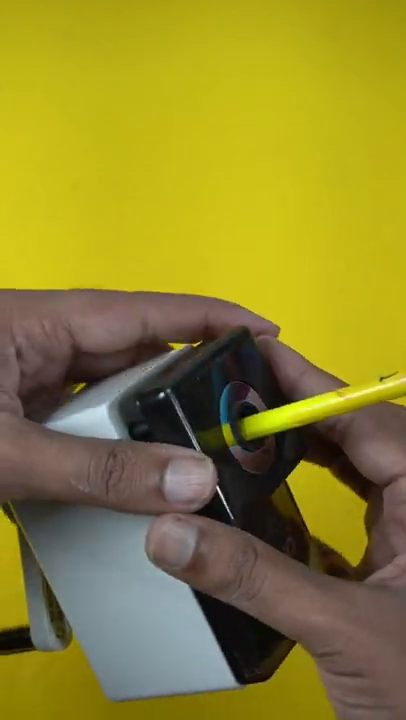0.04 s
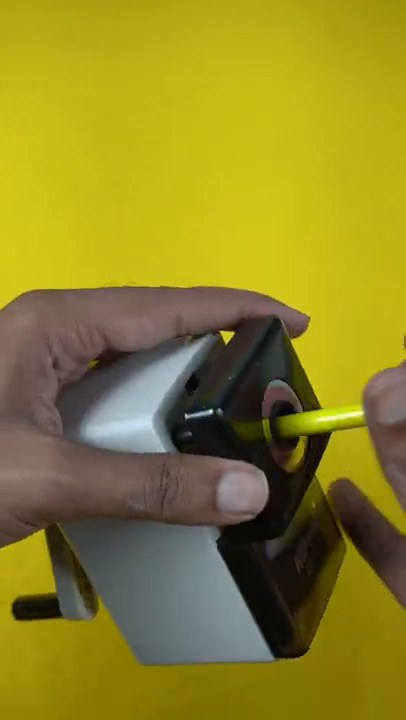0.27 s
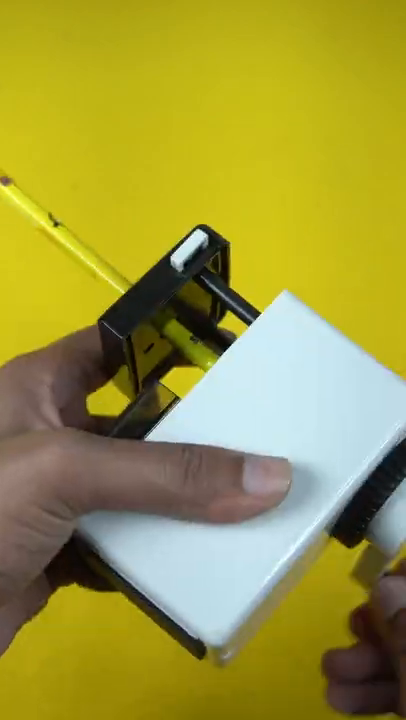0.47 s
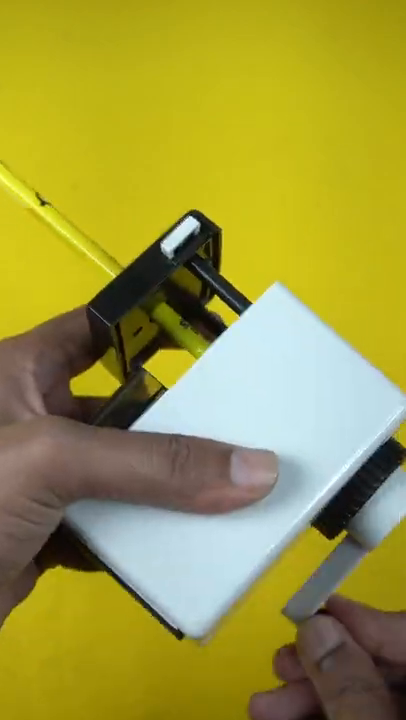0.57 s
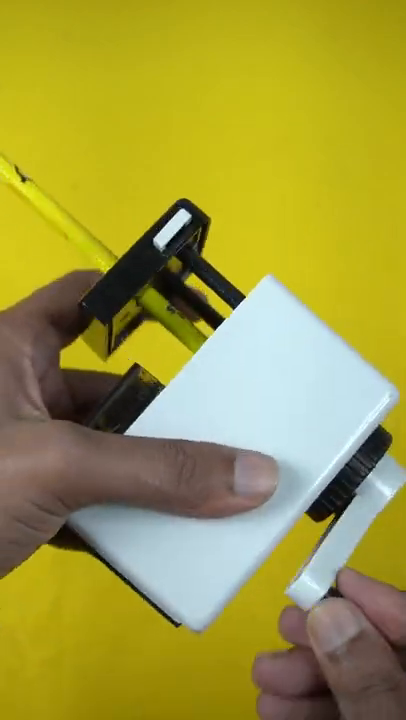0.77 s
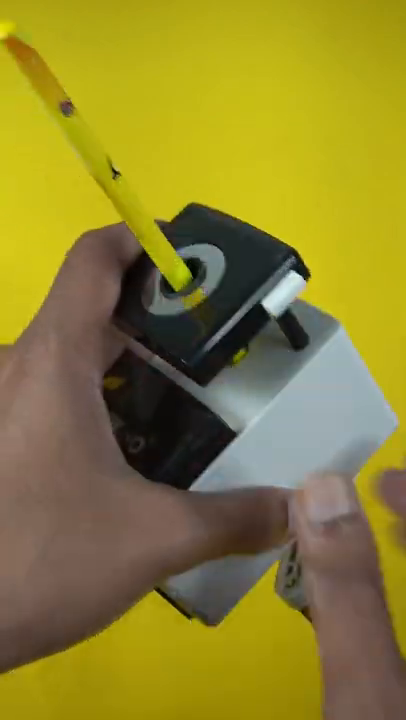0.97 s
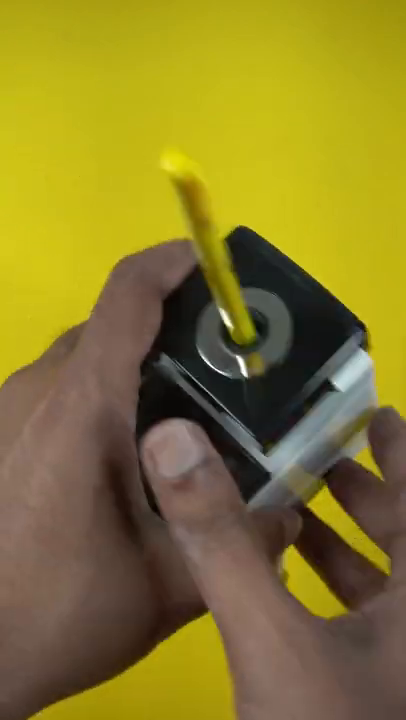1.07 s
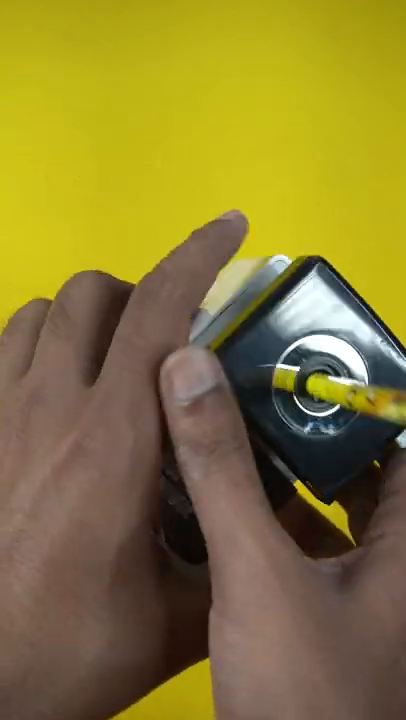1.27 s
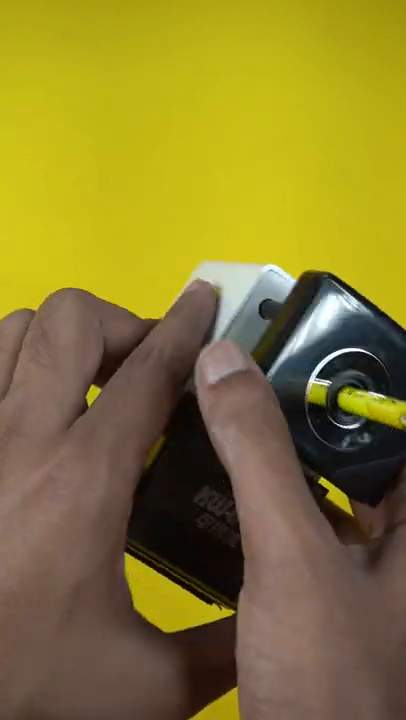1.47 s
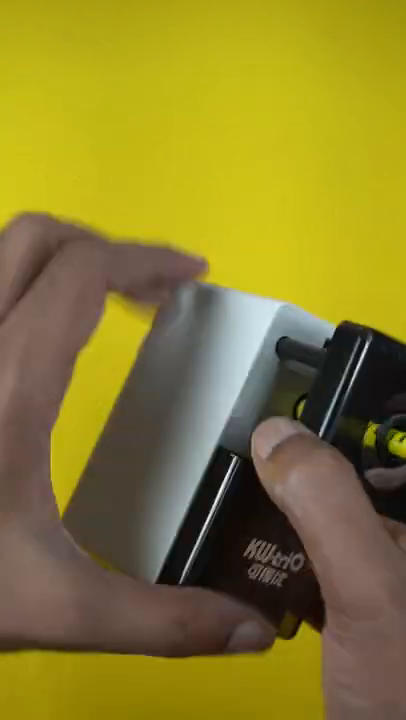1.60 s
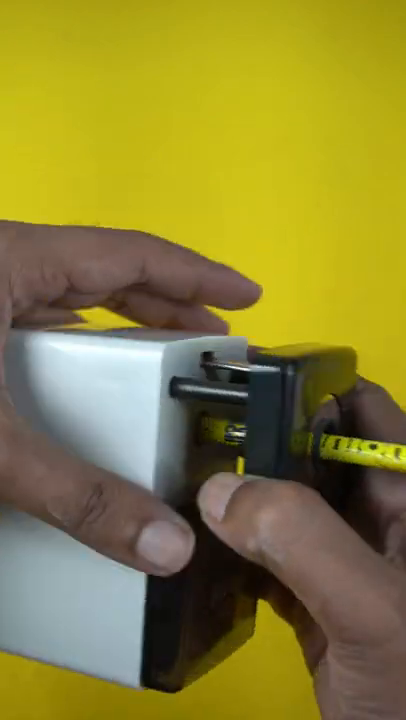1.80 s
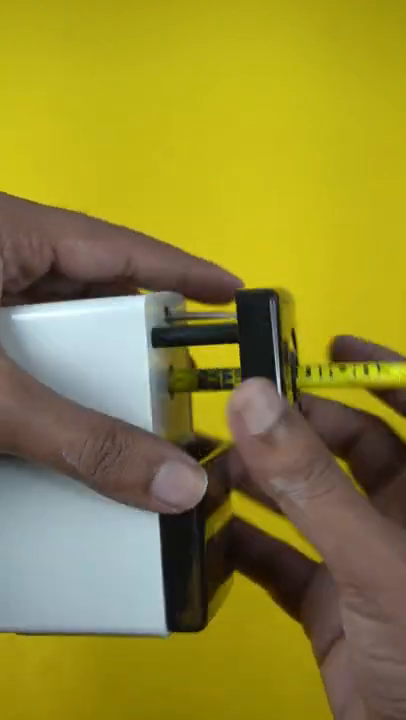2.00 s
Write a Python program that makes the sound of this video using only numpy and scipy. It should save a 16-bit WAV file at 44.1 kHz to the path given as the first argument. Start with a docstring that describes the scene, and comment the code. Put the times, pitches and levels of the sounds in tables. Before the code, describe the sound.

Close up in a small room, a hand-cranked pencil sharpener gives hollow plastic clacks and a short rasp of cut wood. A small metallic click follows, then more rattling knocks and light scraping as its holder shuts and reopens.

```python
"""A hand-cranked pencil sharpener

A plastic sharpener is handled close by, above a table in a small room. Impacts excite the modes of its
hollow casing as knocks and clicks, and the clamp's spring twangs. One turn of the crank drives the milling
cutter through the wood, whose tearing chips excite resonances. A metal catch pings, then the sprung pencil
holder slams home and is drawn out again with sliding friction, over a low rumble and a faint whine."""
import sys
import numpy as np
from scipy import signal
from scipy.fft import rfft, irfft
from scipy.io import wavfile
from scipy.ndimage import uniform_filter1d

SR = 44100
rng = np.random.default_rng(int(sys.argv[2]) if len(sys.argv) > 2 else 0)


def generate_wav(sig):
    """Save sig (samples, or channels by samples) to the path in sys.argv[1] as 16-bit PCM at SR."""
    pcm = np.round(np.clip(np.atleast_2d(sig).T, -1, 1) * 32767).astype(np.int16)
    wavfile.write(sys.argv[1], SR, pcm)


N = 90404
T = np.arange(N) / SR
RING_T = T[:SR // 3]  # time axis of one impact, in seconds
CUTOFF_HZ = 15800


def grinding():
    """Forced vibration: each bite of a blade tears off a spray of chips that drives resonances."""
    # Each row: time in seconds, then relative levels of body, hiss and gear rumble in dB.
    envelope = [(0.402, -75, -60, -59), (.412, -38, -49, -42), (.44, -42, -51, -49),
                (0.474, -40.5, -52.5, -53), (0.495, -35.5, -39, -48), (.526, -32.5, -43, -52),
                (0.572, -38, -45, -41.5), (0.584, -32, -35.5, -51), (.606, -33.5, -42, -42),
                (.622, -34.5, -34, -41), (0.647, -31.5, -39, -39.5), (.68, -29.5, -38.5, -47),
                (.706, -26.5, -32.5, -37.5), (0.739, -34, -43, -46.5), (0.771, -34.5, -40.5, -56),
                (.795, -54, -67, -53), (.83, -73, -77, -61)]
    # Resonances under the cutter, low and high. Each row: centre and width in Hz, relative gain in dB.
    body_peaks = [(642.3, 30, 0), (785, 18, 1), (817, 21, 1.5), (860.4, 25, 3.5), (909, 20, 1.5),
                  (987, 50, -3), (1078, 74, -2.5), (1300, 150, -5.5), (1498, 86, -4), (1863, 116, -1.5),
                  (1997, 124, -4), (2255, 114, -2.5), (3146, 250, -9.5), (3660, 230, -11)]
    hiss_peaks = [(3340, 360, -13), (4440, 890, 4), (5870, 270, 8), (6230, 610, 0.5), (7870, 480, 5),
                  (8830, 430, 6), (10700, 2500, -1.5), (13800, 2400, -0.5), (16300, 910, 0)]
    times, *levels_db = np.transpose(envelope)
    body_gain, hiss_gain, rumble_gain = [
        from_db(np.interp(T, times, db, left=-120, right=-120)) for db in levels_db]
    count, blades_per_s, jitter, bite_depth = 100, 100, 0.3, 2.4
    bite_times = times[0] + (np.arange(count) + jitter * rng.standard_normal(count)) / blades_per_s
    bites = np.zeros(N)
    bites[np.clip(bite_times * SR, 0, N - 1).astype(int)] = rng.uniform(0.28, 0.57, count)
    load = 1 + bite_depth * signal.fftconvolve(bites, decay(t60=0.022))[:N]
    load /= np.sqrt(np.mean(load[(T > times[0]) & (T < times[-1])] ** 2))
    chips = load * np.array([grains(N, per_s=16000, spread_db=2.5) for _ in range(2)])
    body = from_db(2.5) * resonate(widen(chips, width=0.35), body_peaks)
    hiss = from_db(3) * pan(0.58) * resonate(widen(chips, width=0.72), hiss_peaks)
    rumble = unit_power(band(widen(chips, width=0.15), 267, 700, order=2))
    return body_gain * body + hiss_gain * hiss + rumble_gain * rumble


def cutter_song():
    """Frictional excitation: under heavy load the wood rubs the steel cutter into resonance."""
    # Each row: time in seconds, level in dB.
    envelope = [(.63, -56), (.665, -36), (.695, -33), (.72, -43), (.775, -53), (.80, -76)]
    # Each row: centre and width of a resonance in Hz, relative gain in dB.
    steel_peaks = [(3630, 120, -19), (5830, 230, -7), (6750, 130, 2.5), (8170, 430, 2), (8380, 350, 4.5)]
    times, db = np.transpose(envelope)
    gain = from_db(np.interp(T, times, db)) * (T > times[0]) * (T < times[-1])
    return gain * resonate(stereo_noise(N, width=0.31), steel_peaks)


def impacts(blows, rattle_db, rattles_per_s, ring_db, shell_db, shell_t60, top_hz):
    """Convolution: a strike and a rattle of loose parts sound through thin shell and hollow casing."""
    # Each row: frequency in Hz, relative level in dB, 60 dB decay time in seconds.
    casing_modes = [(636, -1, 0.062), (674, -7, .08), (758, -1.5, 0.068), (837, -3, 0.054),
                    (880, -2.5, 0.032), (971.5, -1, 0.058), (1074, 4, 0.021), (1315, 1, 0.052),
                    (1477, -1.5, 0.058), (1565, 1, 0.036), (1732, 8, 0.029), (2007, -3, 0.038),
                    (2566, -3.5, 0.032), (2934, -1, 0.017)]
    # Limits of the body, clack, edge and snap bands in Hz.
    edges_hz = [520, 1400, 2600, 5200, 16000]
    attack_s, thump_db, strike_spread_db = 0.008, -15, 2.5
    out = np.zeros((2, N))
    for start, rattle_t60, *levels_db, side_db in blows:
        # Each blow lands elsewhere and favours other modes.
        struck = [(hz, db + strike_spread_db * rng.standard_normal(), t60)
                  for hz, db, t60 in casing_modes]
        ring = from_db(ring_db) * modes(struck)
        ring[0] += 1  # the direct path
        blow = from_db(rattle_db) * grains(len(RING_T), rattles_per_s, spread_db=2.4) * decay(rattle_t60)
        blow[0] += 1  # the strike itself
        shell = stereo_noise(len(RING_T), width=0.63) * decay(shell_t60)
        shell *= from_db(shell_db) / np.linalg.norm(shell[0])
        shell[:, 0] += 1
        burst = whiten(convolve(shell, blow))
        sound = band(convolve(burst, ring), 150, top_hz, order=2)
        parts = [band(sound, low, high) for low, high in zip(edges_hz, edges_hz[1:])]
        thump = band(sound, 315, 720, order=2)
        for part, db in zip(parts + [thump], levels_db + [levels_db[0] + thump_db]):
            attack_rms = part[:, :int(attack_s * SR)].std()
            add(out, start, pan(side_db) * from_db(db) * part / attack_rms)
    return out


def knocks():
    """Impact excitation: blows of casing and holder set the hollow plastic ringing."""
    # Each row: start and rattle decay time in seconds, then body, clack, edge, snap and pan in dB.
    blows = [(0.015, 0.0078, -53.5, -47, -78, -75, 2), (0.096, 0.013, -46, -57, -62, -66, -1),
             (0.113, 0.12, -41, -46, -61, -60, -2), (0.132, 0.045, -30, -32, -42, -57, -1),
             (0.1875, 0.024, -26, -30.5, -32, -39, -0.5), (0.336, 0.066, -35, -43, -52, -63, 0.5),
             (0.347, 0.022, -56, -36.5, -42.5, -59, -0.5), (0.4085, 0.086, -61, -36, -40.5, -51, 5),
             (0.435, 0.019, -59, -27, -34, -54, 0), (0.702, 0.011, -37, -29.5, -50, -38, 2),
             (0.7225, 0.019, -25.5, -21.5, -34.5, -47, 1), (0.765, 0.018, -40, -33, -36.5, -54, 1),
             (1.064, 0.057, -49.5, -74, -53, -59, 0), (1.101, 0.079, -36.5, -40.5, -46.5, -48.5, -1.5),
             (1.1095, 0.025, -48, -34.5, -41.5, -56, 2.5), (1.175, 0.018, -39.5, -33, -38.5, -57, -0.5),
             (1.213, 0.06, -50, -46.5, -67, -84, 1), (1.32, 0.023, -52.5, -53, -56, -64, -2),
             (1.383, 0.064, -24, -24.5, -31, -38.5, -0.5), (1.399, 0.061, -30, -25, -34, -51, 2.2),
             (1.679, 0.04, -26.5, -32, -42.5, -61, -0.5), (1.7455, 0.027, -25, -27.5, -32, -50, -2),
             (1.841, 0.042, -40.5, -42.5, -58, -57, 0), (1.852, 0.061, -56, -42.5, -47, -56.5, -1),
             (1.931, 0.046, -63, -45.5, -48, -65, 0), (2.022, 0.024, -44, -65, -56, -51, -4)]
    return impacts(blows, rattle_db=-16.5, rattles_per_s=1700, ring_db=-24.5,
                   shell_db=0.5, shell_t60=0.017, top_hz=9400)


def clicks():
    """Hard contact: brief blows of clamp and gears give more treble and less ring."""
    # Each row: start and rattle decay time in seconds, then body, clack, edge, snap and pan in dB.
    blows = [(0.181, 0.0051, -31.5, -34, -37, -37.5, 0), (0.232, 0.014, -69, -41.5, -30.5, -31, 0.5),
             (0.866, 0.0085, -48, -54, -57, -53, 2), (1.649, 0.0077, -40.5, -38, -37, -49, 0.5),
             (1.735, 0.0055, -42, -34, -39, -48.5, 2), (1.7695, 0.013, -51, -44, -30.5, -35.5, 0),
             (1.7925, 0.0073, -69, -38.5, -37, -46.5, 1), (1.945, 0.0033, -68, -45, -41, -65, 0),
             (1.998, 0.0088, -69, -57, -36.5, -49, 0.7)]
    return impacts(blows, rattle_db=-13, rattles_per_s=3400, ring_db=-32,
                   shell_db=2.5, shell_t60=0.018, top_hz=11700)


def catch():
    """Modal ringing: a small steel catch snaps into place and pings."""
    # Each row: frequency in Hz, relative level in dB, 60 dB decay time in seconds.
    steel_modes = [(2830, -1, 0.021), (3290, 6.5, 0.037), (4440, 0, 0.02), (4980, -2.5, 0.022),
                   (5116, 4, 0.022), (5700, -5, 0.017), (5900, 1.5, 0.01), (7040, -5, 0.033),
                   (8260, -3, .035), (8750, 3, 0.033), (9400, -7, 0.021), (13050, -20, 0.025)]
    burst = whiten(stereo_noise(len(RING_T), width=0.95) * decay(t60=0.026))
    snap = from_db(-2) * band(burst, 1830, 7700, order=2)
    ping = from_db(-35) * modes(steel_modes)
    out = np.zeros((2, N))
    add(out, start=0.8812, sound=snap + ping)
    return out


def clamp_spring():
    """Free vibration: the clamp's spring rings briefly when it is let go."""
    # Each row: frequency in Hz, relative level in dB, 60 dB decay time in seconds.
    spring_modes = [(1740, 0.5, 0.074), (1884, 18, 0.022), (2070, -5, 0.051), (2110, 8, 0.034)]
    # Each row: start in seconds, gain in dB.
    twangs = [(.2325, -36.5), (.866, -53), (1.7685, -42.5), (1.9445, -47)]
    out = np.zeros((2, N))
    for start, db in twangs:
        add(out, start, from_db(db) * modes(spring_modes))
    return out


def rubbing():
    """Sliding friction: tiny slips over plastic, hissing rods, shuffling hands and one thin squeak."""
    # Each row: start and length in seconds, level in dB.
    rubs = [(.135, 0.12, -46), (0.199, .045, -44), (1.099, 0.091, -49.5), (1.19, 0.083, -50.5),
            (1.27, 0.3, -60), (1.372, 0.068, -40.5), (1.764, 0.061, -45), (1.95, 0.053, -50.5),
            (1.995, 0.066, -46)]  # fingers and pencil on the plastic
    rod_slides = [(1.115, 0.082, -57), (1.972, 0.13, -56.5)]  # the holder's rods in their guides
    grip_shifts = [(1.23, 0.28, -58.5), (1.66, 0.091, -57), (1.76, 0.17, -59.5), (1.97, 0.13, -50)]
    # Each row: frequency in Hz, relative level in dB.
    rub_spectrum = [(150, -5), (300, -11.5), (500, 4.5), (700, -4.5), (1800, 2.5), (3200, -1.5),
                    (6000, -19.5), (10000, -20.5), (16000, -31)]
    # The holder's squeak. Each row: time in seconds, pitch in Hz.
    squeak_pitch = [(1.18, 5350), (1.215, 5750), (1.25, 5800), (1.29, 5400)]
    slips = widen([grains(N, per_s=3000, spread_db=3) for _ in range(2)], width=0.4)
    rub = swells(rubs) * coloured(slips, rub_spectrum)
    hiss = unit_power(band(stereo_noise(N, width=0.87), 6440, CUTOFF_HZ, order=1))
    shuffle = unit_power(band(stereo_noise(N, width=0.19), 171, 390, order=2))
    times, hz = np.transpose(squeak_pitch)
    squeak = from_db(-64) * tone(np.interp(T, times, hz)) * np.interp(T, times, [0, 1, 1, 0])
    return rub + swells(rod_slides) * hiss + swells(grip_shifts) * shuffle + squeak


def room(x):
    """Reverberation: diffuse reflections build up quickly and decay exponentially."""
    # Each row: lower and upper limit in Hz, 60 dB decay time in seconds, gain in dB.
    bands = [(100, 770, 0.23, -14.5), (552, 1680, 0.22, -8.5), (1480, 3530, 0.21, -8.5),
             (2960, 7700, 0.21, -6), (7100, 22000, 0.22, -11)]
    onset_s = 0.0032
    build_up = 1 - np.exp(-(RING_T / onset_s) ** 2)
    tail = 0
    for low, high, t60, db in bands:
        echoes = stereo_noise(len(RING_T), width=0.61) * decay(t60) * build_up
        tail = tail + from_db(db) * band(echoes / np.linalg.norm(echoes[0]), low, high)
    return convolve(x, tail)


def air():
    """Stationary noise: low rumble and hiss, with a faint whine under random frequency modulation."""
    # Each row: frequency in Hz, relative spectral density in dB.
    spectrum = [(20, -7.5), (33, 1), (45, 5), (70, -3.5), (120, -5), (200, -4), (400, -6), (1000, -13.5),
                (1900, -21.5), (4000, -23.5), (8000, -27.5), (16000, -29.5)]
    mid = coloured(rng.standard_normal(N), spectrum)
    side = coloured(rng.standard_normal(N), [(20, -22), (200, -9.5), (2000, -18), (16000, -32.5)])
    whine_hz, waver_hz = 6960, 45
    waver = unit_power(band(rng.standard_normal(N), 4.4, 150, order=1))
    whine = tone(whine_hz + waver_hz * waver)
    return from_db(-52.5) * widen([mid, side], width=0.72) + from_db(-66.5) * whine


def modes(table):
    """Modal superposition: damped sinusoids start roughly in phase."""
    phases = rng.uniform(-1.04, 1, len(table)) * np.pi / 2
    return sum(from_db(db) * decay(t60) * np.cos(2 * np.pi * hz * RING_T + phase)
               for (hz, db, t60), phase in zip(table, phases))


def resonate(x, peaks):
    """Resonance: parallel two-pole filters of alternating sign, summed to unit power."""
    out = 0
    for k, (hz, width_hz, db) in enumerate(peaks):
        radius = np.exp(-np.pi * width_hz / SR)
        feedback = [1, -2 * radius * np.cos(2 * np.pi * hz / SR), radius ** 2]
        gain = (-1) ** k * from_db(db) * (1 - radius ** 2) / 2
        out = out + gain * signal.lfilter([1, 0, -1], feedback, x)
    return unit_power(out)


def grains(size, per_s, spread_db):
    """Shot noise: random tiny impacts of uneven strength, at unit power."""
    strengths = from_db(spread_db * np.minimum(rng.exponential(1, size), 4))
    signs = rng.choice([-1, 1], size)
    return unit_power(strengths * signs * (rng.random(size) < per_s / SR))


def tone(hz):
    """A sinusoid whose phase is the integral of its frequency."""
    return np.sin(2 * np.pi * np.cumsum(hz) / SR)


def swells(slides):
    """Amplitude envelope of short slides that rise quickly, hold and fade."""
    shape = [0.0075, 0.99, 1.0, 0.027]
    return sum(from_db(db) * np.interp(T, start + np.array([0, 0.01, length / 2, length]), shape)
               for start, length, db in slides)


def decay(t60):
    """Exponential damping by 60 dB in t60 seconds."""
    return from_db(-60 * RING_T / t60)


def whiten(x):
    """Spectral whitening levels out the chance colour of a short burst."""
    spectrum = rfft(x, 2 * len(RING_T))
    power = uniform_filter1d(np.abs(spectrum) ** 2, size=61, axis=-1)
    return irfft(spectrum / np.sqrt(np.abs(power) + 1e-12))[..., :len(RING_T)]


def gain_curve(hz, db):
    """A frequency response, interpolated in dB over log frequency."""
    bins_hz = np.maximum(np.fft.rfftfreq(N, 1 / SR), 1)
    return from_db(np.interp(np.log(bins_hz), np.log(hz), db))


def coloured(x, spectrum):
    """Spectral shaping of a steady sound, at unit power."""
    return unit_power(irfft(rfft(x) * gain_curve(*np.transpose(spectrum)), N))


def band(x, low_hz, high_hz, order=3):
    """Causal band-pass filtering."""
    sections = signal.butter(order, [low_hz, min(high_hz, SR / 2 - 500)], "band", fs=SR, output="sos")
    return signal.sosfilt(sections, x + 1e-18)


def convolve(x, response):
    """Transmission through a linear system with the given impulse response."""
    return signal.fftconvolve(x, np.atleast_2d(response), axes=1)[:, :x.shape[1]]


def widen(pair, width):
    """Mid-side mixing: one signal is common to both channels, the other is their difference."""
    return (pair[0] + width * pair[1] * np.array([[1], [-1]])) / np.sqrt(1 + width ** 2)


def stereo_noise(size, width):
    """White noise, partly coherent between the channels."""
    return widen(rng.standard_normal((2, size)), width)


def pan(db):
    """Gains for a level difference of left over right."""
    return from_db(np.array([[db], [-db]]) / 2)


def from_db(db):
    """Decibels to amplitude ratio."""
    return 10 ** (np.asarray(db) / 20)


def unit_power(x):
    """Scaling to a mean square of one."""
    return x / np.sqrt(np.mean(x ** 2) + 1e-20)


def add(out, start, sound):
    """Superposition of a sound from a start in seconds."""
    i = int(start * SR)
    out[:, i:i + sound.shape[-1]] += sound[..., :N - i]


def scene():
    """Superposition of the sharpener's direct sound, its reverberation and the background."""
    sharpener = knocks() + clicks() + catch() + clamp_spring() + grinding() + cutter_song() + rubbing()
    return sharpener + room(sharpener) + air()


def record(dry):
    """Coherence: two close microphone ports hear the low mids much alike; the top is cut steeply."""
    # Each row: frequency in Hz, gain of the ports' difference in dB, left over right in dB.
    ports = [(100, -8.5, 0.5), (354, -1.5, -0.5), (704, -7, 0), (1270, -2.5, -2.5), (2400, -1, -1.5),
             (4500, 0.5, -0.1), (8500, -1, 0.3), (15000, -1.5, 1)]
    hz, side_db, balance_db = np.transpose(ports)
    mid = rfft(dry[0] + dry[1]) / 2
    side = gain_curve(hz, side_db) * rfft(dry[0] - dry[1]) / 2
    lean = gain_curve(hz, balance_db / 2)
    heard = irfft(np.array([(mid + side) * lean, (mid - side) / lean]), N)
    return signal.sosfilt(signal.ellip(10, 0.2, 80, CUTOFF_HZ, fs=SR, output="sos"), heard)


dry = scene()
out = record(dry)
generate_wav(out)
```